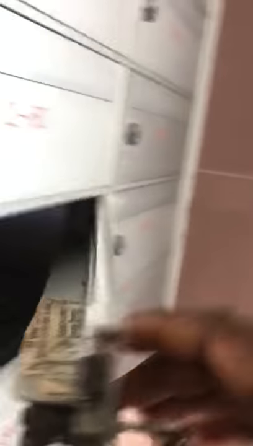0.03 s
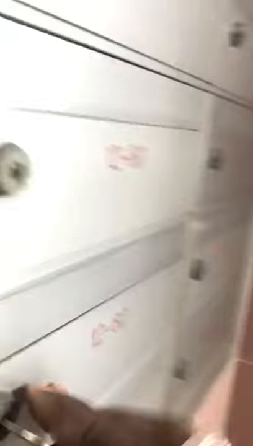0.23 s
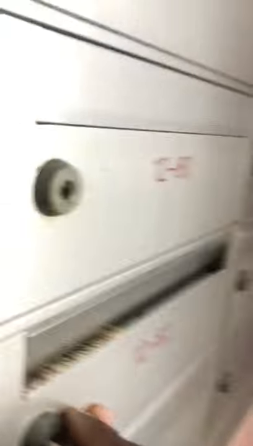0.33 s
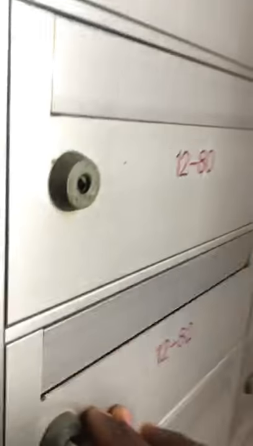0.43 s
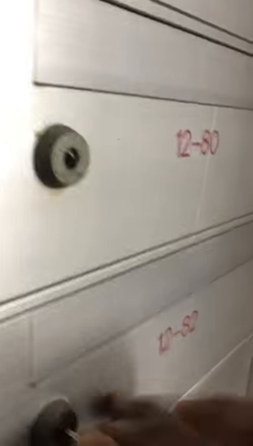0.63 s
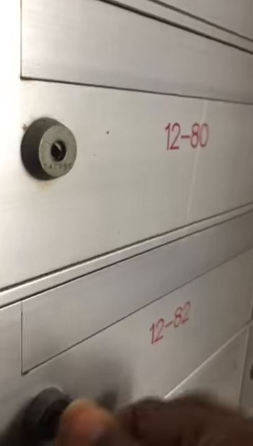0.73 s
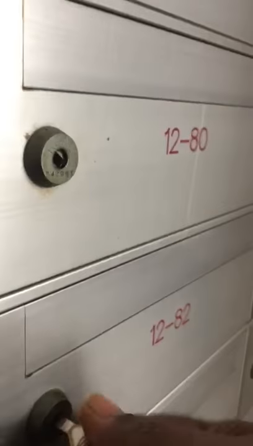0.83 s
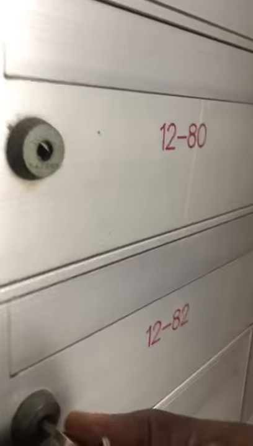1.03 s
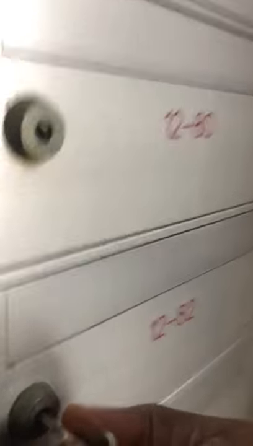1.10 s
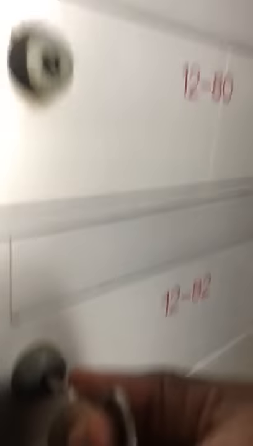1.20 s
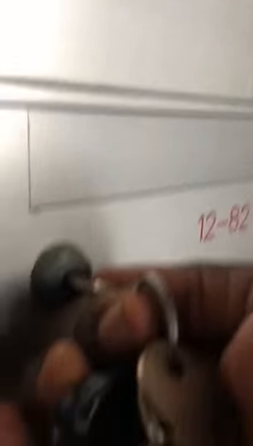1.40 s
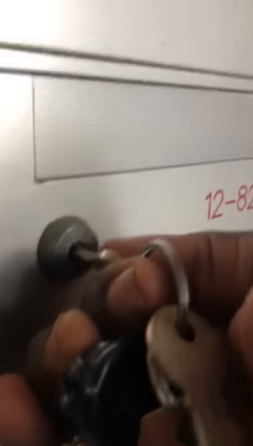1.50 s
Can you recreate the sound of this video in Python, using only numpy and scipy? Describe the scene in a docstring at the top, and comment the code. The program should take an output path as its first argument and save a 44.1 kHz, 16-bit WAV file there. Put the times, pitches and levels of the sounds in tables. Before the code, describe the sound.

A thin metal letter box door claps shut with a rattle and hard latch click, then a bunch of keys clinks and jingles in the lock; close microphone, hard-walled lobby, faint distant traffic.

```python
"""A hard-walled lobby: a thin metal letter box door is pushed shut with a clatter; the latch clicks
and a bunch of keys jingles while one turns in the lock. Far off, traffic and an engine's faint drone.
Door and keys are noise bursts plus decaying modes; rattle is random impulses in third-octave bands;
rustle and traffic are banded noise, the drone two wavering sines. A noise tail gives the lobby's echo."""
import sys
import numpy as np
from scipy import signal
from scipy.fft import rfft, irfft
from scipy.io import wavfile

SR = 44100
rng = np.random.default_rng(int(sys.argv[2]) if len(sys.argv) > 2 else 0)


def field_ratio(decibels):
    """Amplitude ratio for a level in dB (20 dB per decade); scalars and array-likes work."""
    return 10 ** (np.asarray(decibels, dtype=float) / 20)


def master_out(mix):
    """Clip the mix to full scale and print it as 16-bit PCM to the path in sys.argv[1]."""
    frames = np.transpose(np.atleast_2d(mix))
    ceiling = np.clip(frames, -1, 1)
    pcm = np.round(ceiling * 32767).astype(np.int16)
    wavfile.write(sys.argv[1], SR, pcm)


N = 68355  # samples


def gain_curve(rows):
    """Interpolate (t/s, level/dB) rows to a gain per sample, silent outside their span."""
    time_s, level_db = np.transpose(rows)
    return field_ratio(np.interp(np.arange(N) / SR, time_s, level_db, left=-200, right=-200))


def rms_one(x):
    """Scale to rms 1."""
    return x / np.sqrt(np.mean(x ** 2) + 1e-20)


def drift(rate_hz):
    """Slow random wander, rms 1: white noise through a two-pole lowpass."""
    pole = np.exp(-2 * np.pi * rate_hz / SR)
    noise = rng.standard_normal(N + SR)
    return rms_one(signal.lfilter([1], [1, -2 * pole, pole * pole], noise)[SR:])


def ring(t, hz, t60_s):
    """Exponentially decaying sine."""
    return np.sin(2 * np.pi * hz * t) * field_ratio(-60 * t / t60_s)


def bandpass(x, low_hz, high_hz):
    """Second-order Butterworth band design."""
    return signal.sosfilt(signal.butter(2, [low_hz, high_hz], "band", fs=SR, output="sos"), x)


def add(out, time_s, piece):
    """Mix a piece into out at time_s."""
    i = int(time_s * SR)
    out[i:i + len(piece)] += piece[:N - i]


def coloured(sources, spectrum, flicker_db):
    """Third-octave bands taken alternately from two sources, each levelled and flickering; rms 1."""
    out = 0
    edges_hz = 18 * 2 ** np.arange(0, 9.7, 1 / 3)
    hz, db = np.transpose(spectrum)
    for k, (low, high) in enumerate(zip(edges_hz, edges_hz[1:])):
        band = bandpass(sources[k % 2], low, high)
        band_db = np.interp(np.log(low * high) / 2, np.log(hz), db)
        out = out + band * field_ratio(band_db + flicker_db * drift(10.6))
    return rms_one(out)


# far traffic level: [t/s, level/dB]
TRAFFIC_LEVEL = [(0, -50), (.4, -44.5), (1.1, -46), (1.3, -40.5), (1.55, -40)]
# traffic spectrum: [f/Hz, level/dB per Hz]
TRAFFIC_SPECTRUM = [(35, -10.5), (70, 5), (312, 0), (994, -12.5), (3160, -27.5), (12000, -47)]
# far engine's partials: [f/Hz, level/dB re traffic]
ENGINE_PARTIALS = [(199, -6), (298, -14)]


def street():
    """Traffic as banded noise; engine drone as sines wavering in level and phase."""
    t = np.arange(N) / SR
    drone = np.zeros(N)
    for hz, db in ENGINE_PARTIALS:
        level = field_ratio(db + 0.63 * drift(1.6)) * np.sqrt(2)
        cycles = hz * t + rng.random() + 0.026 * drift(7.1)
        drone += level * np.sin(2 * np.pi * cycles)
    traffic = coloured(rng.standard_normal((2, N)), TRAFFIC_SPECTRUM, flicker_db=2.5)
    return gain_curve(TRAFFIC_LEVEL) * (traffic + drone)


LOBBY_T60_S, LOBBY_DB, WALL_CUT_HZ = .17, -13.5, 15500


def lobby(x):
    """Hard-wall echoes: convolution with lowpassed, decaying noise of unit energy."""
    t = np.arange(SR // 2) / SR
    onset = np.minimum(t / 0.0028, 1)
    echoes = rng.standard_normal(len(t)) * field_ratio(-60 * t / LOBBY_T60_S) * onset
    echoes = signal.sosfilt(signal.butter(1, WALL_CUT_HZ, fs=SR, output="sos"), echoes)
    return signal.fftconvolve(x, echoes / np.linalg.norm(echoes))[:N]


# hand and keys rub: [t/s, level/dB]
RUSTLE_LEVEL = [(0, -47), (.21, -53), (.60, -48.5), (.73, -48), (.89, -43), (.915, -51), (.955, -50),
                (.97, -56), (1.065, -57), (1.10, -44.5), (1.185, -50.5), (1.20, -56.5), (1.55, -70.5)]
# rustle spectrum: [f/Hz, level/dB per Hz]
RUSTLE_SPECTRUM = [(900, -12), (2000, 0), (4000, -4.5), (9000, -4.5), (12500, -14.5)]


def rustle():
    """Hand and keys rubbing: flickering banded noise."""
    noise = rng.standard_normal((2, N))
    return gain_curve(RUSTLE_LEVEL) * coloured(noise, RUSTLE_SPECTRUM, flicker_db=4.5)


# door and keys shake after the slam: [t/s, level/dB]
RATTLE_LEVEL = [(.3135, -34.5), (.340, -20.5), (.362, -24.5), (.380, -24), (.392, -35.5), (.420, -29.5),
                (.445, -38.5), (.495, -31.5), (.570, -42), (.660, -46.5)]
# rattle spectrum: [f/Hz, level/dB per Hz]
RATTLE_SPECTRUM = [(200, 2), (800, 4.5), (2000, 3), (4500, 0.5), (9500, 4), (12500, -39.5)]
RATTLE_PER_S, RATTLE_GRAIN_DB = 9000, 3.5


def rattle():
    """Loose sheet metal and keys: dense random impulses of uneven size and sign."""
    size_db = RATTLE_GRAIN_DB * np.minimum(rng.exponential(1, (2, N)), 5)
    sizes = field_ratio(size_db) * rng.choice([-1, 1], (2, N))
    touches = sizes * (rng.random((2, N)) < RATTLE_PER_S / SR) + 1e-18
    return gain_curve(RATTLE_LEVEL) * coloured(touches, RATTLE_SPECTRUM, flicker_db=3.0)


# keys strike, ring freely, then a finger or neighbour stops them:
# [t/s, level/dB, favoured f/Hz, free ringing/s]
KEY_CLINKS = [(0.368, -2, 8800, 0.003), (0.381, -1, 10800, 0.048), (0.384, -5.5, 9680, 0.061),
              (0.556, -17.5, 10550, 0.0039), (0.5773, -10.5, 10100, 0.035), (0.694, -17, 12400, 0.0086),
              (0.7436, -27.5, 8300, 0.0088), (0.759, -13.5, 9660, 0.019), (0.7844, -8, 11500, 0.012),
              (0.8368, -10, 9880, 0.036), (0.931, -27.5, 8570, 0.021), (1.07, -25.5, 3900, 0.0052),
              (1.094, -11.5, 4860, 0.021), (1.132, -22.5, 3860, 0.0057), (1.094, -7, 10730, 0.011),
              (1.104, -16, 7040, 0.018), (1.115, -21.5, 9700, 0.0032), (1.1256, -2.5, 10440, 0.0045),
              (1.1259, -21, 5970, 0.0085), (1.1259, -29, 7600, 0.0085), (1.1690, -24, 6800, 0.0022),
              (1.181, -16, 11130, 0.0051), (1.181, -35, 8000, 0.007)]
# modes of the keys: [f/Hz, level/dB]
KEY_MODES = [(4000, -5), (5160, -9.5), (5800, -4), (6600, -7), (7600, -1), (8050, -3.5), (8620, -8),
             (9235, -3), (10235, -8), (11180, -14), (11960, -15)]
KEY_T60_S, STOPPED_T60_S, FAVOUR_HZ = 0.064, 0.021, 500
TICK_DB, TICK_T60_S = -6.5, 0.01
CHATTER_PER_S, CHATTER_DB = 2200, -18


def keys():
    """Each strike and its chatter excite a noise tick and the modes near a favoured pitch, then damp."""
    out = np.zeros(N)
    t = np.arange(4096) / SR
    for time_s, db, favoured_hz, free_s in KEY_CLINKS:
        luck_db = rng.normal(0, 1.5, len(KEY_MODES))
        modes = np.zeros(len(t))
        for (hz, mode_db), offset_db in zip(KEY_MODES, luck_db):
            nearness = np.exp(-.5 * ((hz - favoured_hz) / FAVOUR_HZ) ** 2)
            modes += nearness * field_ratio(mode_db + offset_db) * ring(t, hz, KEY_T60_S)
        burst = rng.standard_normal(len(t)) * field_ratio(-60 * t / TICK_T60_S)
        tick = bandpass(burst, favoured_hz / 1.53, min(favoured_hz * 1.36, 14000))
        # keys keep touching while they ring freely
        chatter = field_ratio(CHATTER_DB) * rng.standard_normal(len(t))
        chatter *= (rng.random(len(t)) < CHATTER_PER_S / SR) * (t < free_s)
        touches = chatter + (t == 0)
        touches /= np.linalg.norm(touches)
        clink = signal.fftconvolve(touches, modes / 2 + field_ratio(TICK_DB) * tick)[:len(t)]
        damping = field_ratio(-60 * np.maximum(t - free_s, 0) / STOPPED_T60_S)
        add(out, time_s, field_ratio(db) * clink * damping)
    return out


# knocks on door and lock: [t/s, level/dB, centre f/Hz, spread/octaves, t60/s]
DOOR_KNOCKS = [(.2370, -9.5, 3980, 0.69, 0.021), (.2400, -33.5, 576, 0.63, 0.028),
               (0.3143, -9.5, 1880, 1.09, 0.023), (.3435, -4.5, 2400, 1.31, 0.04),
               (0.3669, -5, 1440, 0.18, 0.015), (0.389, -9.5, 5240, 0.71, 0.12),
               (0.4881, -0.5, 7000, 1.44, 0.015), (0.5, -19.5, 2500, 0.17, 0.037),
               (0.6199, -21.5, 5260, 1, 0.035), (0.6317, -18, 2680, 0.62, 0.013),
               (0.636, -26, 880, 1.5, 0.018), (.7520, -29, 1570, 1.06, 0.092),
               (0.7593, -15.5, 6000, 0.33, 0.015), (0.8451, -12, 2440, 0.57, 0.012),
               (0.847, -21.5, 720, 0.53, 0.029), (0.995, -34, 6060, 0.51, 0.021),
               (1.0346, -30, 2800, 1.1, 0.0066), (1.0690, -28.5, 4750, 0.95, 0.042),
               (1.0878, -26, 6500, 1, 0.0082), (1.239, -38.5, 1260, 1.1, 0.091),
               (1.3534, -30.5, 8800, 0.66, 0.011)]
# modes of the door: [f/Hz, level/dB, longest t60/s]
DOOR_MODES = [(589, 1, 0.023), (956, -6, 0.019), (1440, -13.5, 0.045), (1647, -15, 0.0554),
              (2134, -7, 0.018), (2865, -16, 0.029), (3860, -10.5, 0.017)]
# the box behind the door booms: [t/s, level/dB]
BOX_BOOMS = [(0.363, -17), (0.418, -26), (.505, -19)]
BOOM_HZ, BOOM_RISE_S, BOOM_T60_S = 148.7, 0.0047, 0.059
CRACK_DB = -8


def door():
    """Knocks: decaying noise crack around a centre pitch plus door modes near it; box: one low mode."""
    out = np.zeros(N)
    t = np.arange(8192) / SR
    bins_hz = np.maximum(np.fft.rfftfreq(len(t), 1 / SR), 1)
    for time_s, db, centre_hz, spread_oct, t60_s in DOOR_KNOCKS:
        def near(hz):
            return np.exp(-.5 * (np.log2(hz / centre_hz) / spread_oct) ** 2)

        noise = irfft(rfft(rng.standard_normal(len(t))) * near(bins_hz))
        crack = rms_one(noise) * field_ratio(CRACK_DB - 60 * t / t60_s)
        luck_db = rng.normal(0, 1.5, len(DOOR_MODES))
        rings = np.zeros(len(t))
        for (hz, mode_db, longest_s), offset_db in zip(DOOR_MODES, luck_db):
            level = near(hz) * field_ratio(mode_db + offset_db)
            rise = 1 - np.exp(-t * hz)
            rings += level * rise * ring(t, hz, min(longest_s, 2 * t60_s))
        onset = np.minimum(t / 0.000074, 1)
        add(out, time_s, field_ratio(db) * onset * (crack + rings))
    for time_s, db in BOX_BOOMS:
        rise = 1 - np.exp(-t / BOOM_RISE_S)
        add(out, time_s, field_ratio(db) * rise * ring(t, BOOM_HZ, BOOM_T60_S))
    return out


def scene():
    """Door, keys and rattle with their echo, the rustle close by, the street behind; one channel."""
    near = door() + keys() + rattle()
    mix = near + field_ratio(LOBBY_DB) * lobby(near) + rustle() + street()
    return mix[None]


def band_limit(x):
    """A steep low-pass at the top of the band."""
    return signal.sosfilt(signal.butter(12, 13080, fs=SR, output="sos"), x)


STOPBAND_HZ, STOPBAND_DB = 12570, 60


def record(dry):
    """Cut the top with a steep lowpass."""
    lowpass = signal.cheby2(14, STOPBAND_DB, STOPBAND_HZ, fs=SR, output="sos")
    mix = signal.sosfilt(lowpass, dry)
    return band_limit(mix)


dry = scene()
out = record(dry)
master_out(out)
```